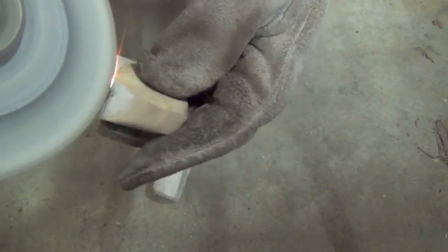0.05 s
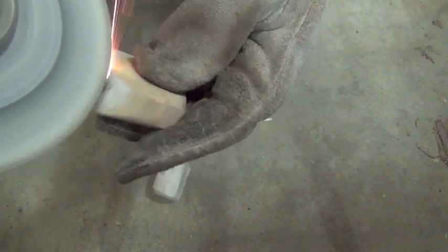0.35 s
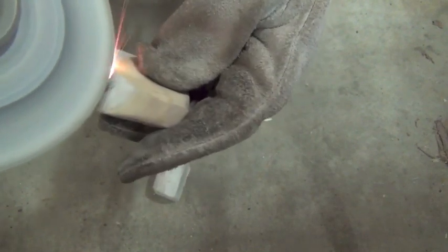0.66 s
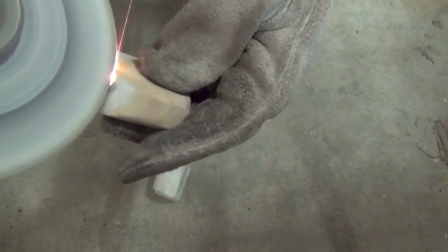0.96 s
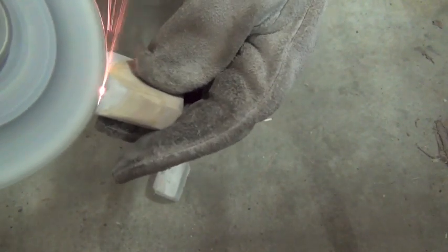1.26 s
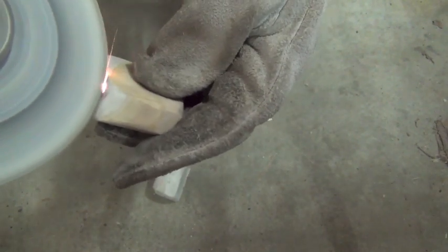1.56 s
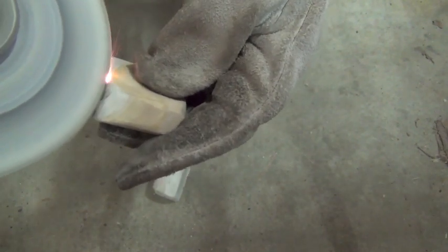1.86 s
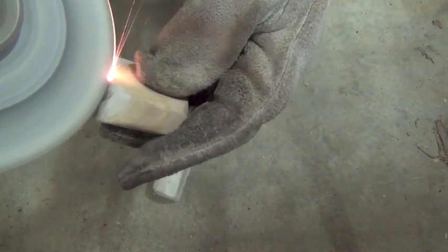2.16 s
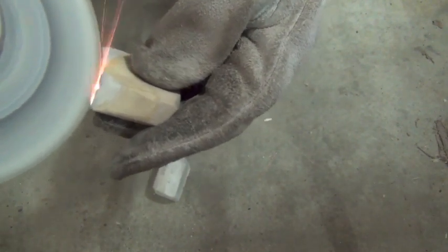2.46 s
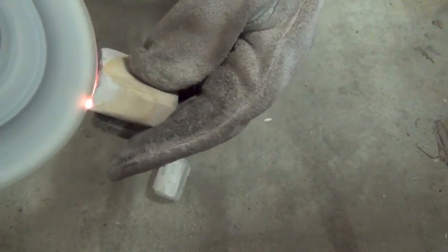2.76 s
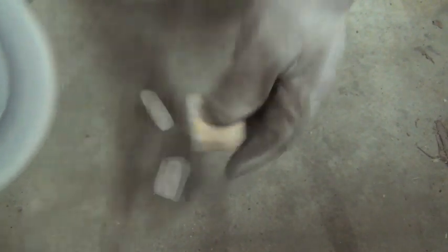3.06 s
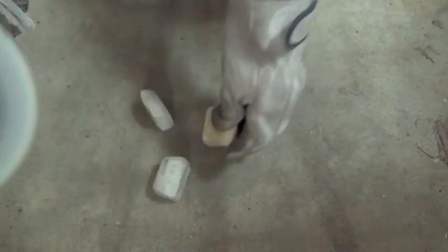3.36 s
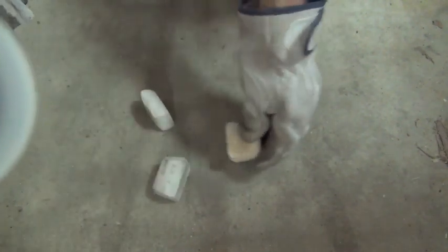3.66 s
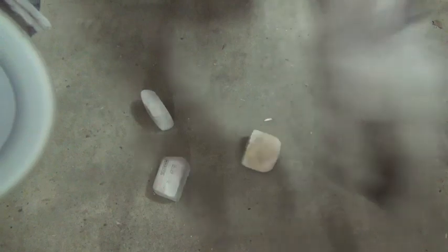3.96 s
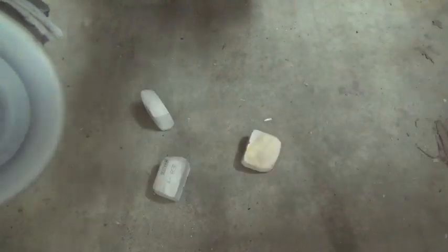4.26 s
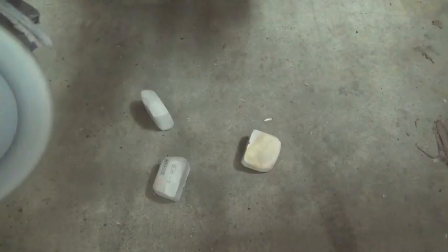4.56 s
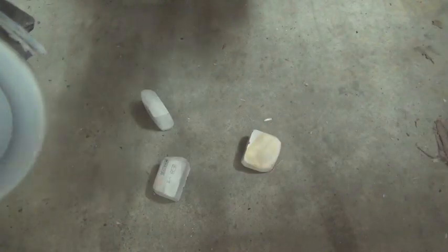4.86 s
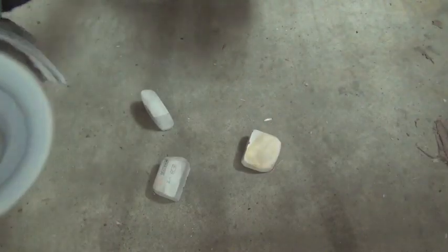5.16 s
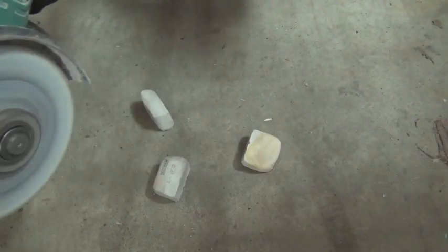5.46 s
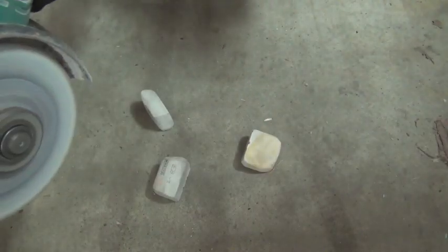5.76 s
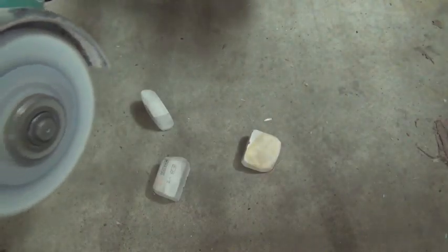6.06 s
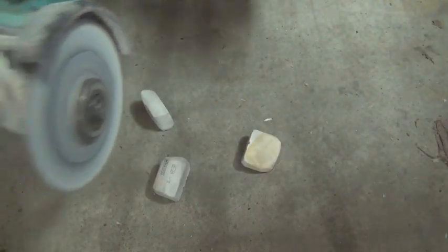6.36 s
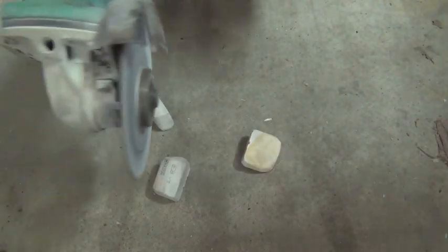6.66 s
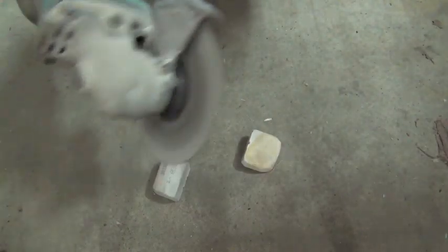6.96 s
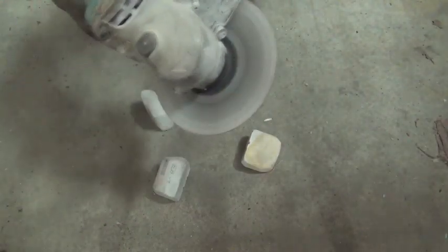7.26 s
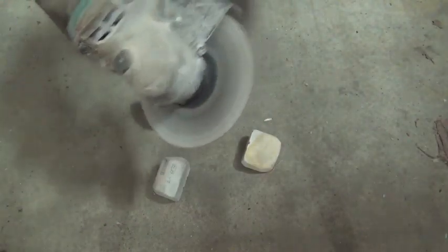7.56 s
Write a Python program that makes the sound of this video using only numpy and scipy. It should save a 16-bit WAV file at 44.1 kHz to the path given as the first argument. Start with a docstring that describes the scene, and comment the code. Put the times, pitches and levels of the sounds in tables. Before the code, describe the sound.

An angle grinder chatters against a hard stone, then runs free with a rushing whine and is switched off, falling in pitch.

```python
"""An angle grinder runs above a concrete floor: its fan rushes, its wheel hums and its motor whines.
From the start a gloved hand holds a hard stone to the wheel; it bounces on the high spot, and each
impact excites the modes of wheel and body. Near 2.9 s the stone is taken away and the motor speeds up.
Near 5.6 s it is switched off and coasts, falling in pitch, while the tool is turned round and its
directivity changes the timbre."""
import sys
import numpy as np
from scipy import signal
from scipy.fft import rfft, irfft, next_fast_len
from scipy.io import wavfile
from scipy.ndimage import uniform_filter1d

SR = 44100
rng = np.random.default_rng(int(sys.argv[2]) if len(sys.argv) > 2 else 0)


def to_wav(sig):
    """Store sig (one row per channel, or 1-D mono) as 16-bit WAV at the path in sys.argv[1].

    Samples outside -1..1 are clipped; the rate is SR.
    """
    pcm = np.clip(np.atleast_2d(sig), -1, 1) * 32767
    pcm = np.round(pcm).astype(np.int16)
    wavfile.write(sys.argv[1], SR, pcm.T)  # frames by channels


N = 344853
T = np.arange(N) / SR
FREE_HZ = 174.1  # rotation rate of the unloaded wheel

# drag of the stone, up to its removal: (time [s], speed lost [turns/s])
STONE_DRAG = [(0, 4.1), (0.25, 4.2), (1, 7.2), (1.5, 10.3), (2, 9.3), (2.4, 10.1), (2.87, 11.9)]
SINCE_RELEASE = np.maximum(T - STONE_DRAG[-1][0], 0)
# stereo balance, tool at the side and in front: (frequency [Hz], left minus right [dB])
BALANCE_BESIDE = [(60, 7), (110, -1), (190, -1), (350, 13.5), (630, 12.5), (1120, 6.5), (2020, 7.5),
                  (3620, 2.5), (6510, 0.5), (11700, 0)]
BALANCE_FRONT = [(60, 7), (110, 16), (190, 7), (350, -14), (630, -5), (1120, 0), (2020, -4.5), (3620, -2),
                 (6510, -3), (11700, 0)]


def gain_of(db):
    """Amplitude ratio of a level in decibels."""
    return 10 ** (np.asarray(db) / 20)


def follow(rows, t=T):
    """Linear interpolation of a table's columns at the times t."""
    times, *columns = np.transpose(rows)
    return [np.interp(t, times, column) for column in columns]


def spectrum_at(points, hz):
    """Interpolation of a spectrum on a logarithmic frequency axis."""
    f, value = np.transpose(points)
    return np.interp(np.log(hz + 1), np.log(f + 1), value)


def peaks(rows, at):
    """Superposed Lorentzian peaks from rows of (centre, full width, height)."""
    return sum(height / (1 + (2 * (at - centre) / width) ** 2) for centre, width, height in rows)


def unit_rms(x):
    """Normalisation to rms 1."""
    return x / np.sqrt(np.mean(x ** 2) + 1e-20)


def levelled(x, size=1600):
    """Division by the running rms evens the level over about size samples."""
    power = uniform_filter1d(uniform_filter1d(x ** 2, size), size)
    return x / np.sqrt(abs(power) + np.mean(x ** 2) / 20)


def drift(hz):
    """Random modulation: noise of rms 1, low-passed near hz."""
    size = N // 32
    f = np.fft.rfftfreq(size, 32 / SR)
    slow = irfft(rfft(rng.standard_normal(size)) * np.exp(-(f / hz) ** 2), size)
    return np.interp(T, np.arange(size) * 32 / SR, unit_rms(slow))


def mottle(shape, frames, bins):
    """Noise of rms 1, correlated over time and frequency by moving averages."""
    slow = uniform_filter1d(rng.standard_normal(shape), frames, axis=0)
    return unit_rms(uniform_filter1d(slow, bins, axis=1))


def panned(x, left_db):
    """Level-difference panning: two channels, left_db apart, whose mean is x."""
    right = 2 / (1 + gain_of(left_db))
    return np.array([(2 - right) * x, right * x])


def beside(x):
    """Frequency-dependent panning: with the tool at the side, the middle range leans left."""
    bins = rfft(x, next_fast_len(N, True))
    hz = np.linspace(0, SR / 2, len(bins))
    return irfft(panned(bins, spectrum_at(BALANCE_BESIDE, hz)))[:, :N]


def balance_db(hz, front):
    """Level difference of the channels as the tool moves from the side (0) to the front (1)."""
    return (1 - front) * spectrum_at(BALANCE_BESIDE, hz) + front * spectrum_at(BALANCE_FRONT, hz)


def facing(t=T):
    """Directivity: the share of each of the tool's four sides in what is heard, times x sides."""
    # (time [s], side heard [0 at the stone, 1 free, 2 tilted, 3 vents near])
    poses = [(2.8, 0.5), (3.1, 1), (4.9, 1), (5.4, 2.02), (6.3, 2), (7.05, 2.5)]
    pose = follow(poses, t)[0]
    return np.maximum(1 - abs(pose[:, None] - np.arange(4)), 0)


def speed_lost(recovery_s=0.95):
    """Load: turns a second lost to the stone's friction, relaxing exponentially after release."""
    return follow(STONE_DRAG)[0] * np.exp(-SINCE_RELEASE / recovery_s)


def wheel_speed(off_s=5.555, coast_s=7.6, friction_hz_per_s=16.2):
    """Turns a second; after switch-off, air drag and constant bearing friction brake the wheel."""
    friction = friction_hz_per_s * coast_s
    air_decay = np.exp(-np.maximum(T - off_s, 0) / coast_s)
    return (FREE_HZ - speed_lost() + friction) * air_decay - friction


def rush_spectrum(t, hz, echo_share=0.66):
    """Directivity, interference and cavity resonance shape the rush: dB, times x frequencies."""
    # spectrum of each side: (frequency [Hz], relative density [dB])
    at_stone = [(30, -27), (157, -16.5), (514, -8.5), (980, -12.5), (1150, -4.5), (1520, -12), (1950, 3.5),
                (2300, -3), (2600, -12.5), (3200, -7.5), (4100, -4.5), (4900, 2.5), (5700, -2),
                (6400, -8.5), (8000, -9.5), (8900, -12), (11000, -10)]
    free = [(18, -68), (30, -35), (314, -20.5), (382, -32), (489, -11.5), (611, -21), (658, -11.5),
            (726, -18), (1000, -14), (1310, -2), (1560, -5.5), (2050, -0.5), (4410, -3.5), (5930, -2),
            (11000, -6.5), (14300, -42), (22000, -120)]
    tilted = [(18, -65), (30, -32), (157, -26.5), (227, -33.5), (298, -21), (392, -27.5), (596, -18),
              (691, -21.5), (1720, -6.5), (2380, -11), (2760, -5), (4520, -2), (5370, -1), (9030, -10.5),
              (11000, -8), (14300, -40), (22000, -120)]
    vents = [(18, -64), (30, -30), (106, -22), (173, -21.5), (864, -24.5), (1160, -3.5), (1250, -6.5),
             (1720, 0), (2050, -9), (2500, -14), (3800, -9), (4520, -9), (5650, 0), (10200, -14.5),
             (11000, -25), (14300, -46), (22000, -120)]
    # echoes off floor and tool, by side: (frequency [Hz], width [Hz], lift before echo_share [dB])
    stone_echoes = [(1170, 52, -7), (2300, 130, 5), (2450, 66, -11), (2600, 240, -5.5), (3660, 360, -11.5),
                    (4600, 66, -12), (5370, 160, 1), (6160, 350, -6), (8600, 200, 6), (9400, 110, -4)]
    free_echoes = [(1590, 60, -2), (1800, 120, 5.5), (1890, 60, -9), (2100, 400, -2), (2570, 150, -1),
                   (3680, 87, 10.5), (3920, 110, 0), (4100, 250, -3), (5900, 180, 6.5), (9000, 480, -7)]
    tilted_echoes = [(1300, 60, 1), (1600, 110, -6), (1740, 81, -0.5), (2080, 95, 3.4), (2370, 110, 0.5),
                     (2750, 92, 2), (4570, 270, -13), (5330, 390, -3), (8270, 110, 1), (9000, 380, -6)]
    vent_echoes = [(1540, 250, 6.5), (2020, 120, -11), (2420, 65, -16), (2630, 90, -5), (3680, 170, 9),
                   (4530, 350, -1), (5550, 200, 4), (5900, 110, -6), (7900, 110, 7), (10700, 110, -8)]
    # resonances of wheel and tool, the first the wheel's own ring set sounding by the air: (frequency [Hz],
    # width [Hz], lift on each of the four sides [dB])
    resonances = [(1730, 90, 2, 3, 2, 2), (2150, 270, 1, -2.5, 3, -2), (5680, 600, 4.5, 1.2, 1.7, 2)]
    # the guard's cavity sinks in pitch as the tool turns: (time [s], frequency [Hz], lift [dB])
    guard = [(0, 3230, 8.5), (1.1, 3110, 3.5), (2.9, 3010, 4.5), (3.6, 3230, 3.5), (4.4, 3380, 9.5),
             (5.5, 3360, 2), (6.35, 2580, 6.5), (6.9, 2460, 15.5), (7.82, 2300, -4)]
    # hand and tool move: (time [s], duration [s], frequency [Hz], width [Hz], lift [dB])
    band_swells = [(3.74, 1.7, 2180, 480, 7.5), (6.4, 0.25, 5100, 430, 2), (6.87, 0.4, 6030, 220, 5),
                   (7.32, 0.6, 6600, 540, 3.5), (7.3, 0.49, 5530, 200, 2.5), (7.2, .35, 8200, 700, 0.5),
                   (7.7, 0.5, 1755, 63, 12)]
    # shelf above about 7 kHz: (time [s], lift [dB])
    treble = [(0, -2), (5.8, 0), (6.2, -1.5), (6.77, 1), (6.95, 0.5), (7.1, 1.5), (7.82, 0)]
    # rush of fan and gears in its middle band: (time [s], relative level [dB])
    loudness = [(0, -18), (.9, -18.5), (1.5, -20.5), (1.95, -19), (2.3, -20.6), (2.8, -21.5), (2.92, -19.5),
                (4.1, -18), (6, -16.5), (7.3, -16), (7.65, -16.5), (7.82, -17.5)]
    share = facing(t)
    sides = [(at_stone, stone_echoes), (free, free_echoes), (tilted, tilted_echoes), (vents, vent_echoes)]
    colour = share @ np.array([spectrum_at(side, np.minimum(hz, 10500)) + echo_share * peaks(echoes, hz)
                               for side, echoes in sides])
    for centre, width, *lifts in resonances:
        colour += peaks([(centre, width, (share @ lifts)[:, None])], hz)
    guard_hz, guard_db = follow(guard, t[:, None])
    colour += peaks([(guard_hz, 175, guard_db)], hz)
    for time, length, centre, width, lift in band_swells:
        swell_db = peaks([(time, length, lift)], t[:, None])
        colour += peaks([(centre, width, swell_db)], hz)
    middle_band = (hz > 2600) & (hz < 7000)
    middle_db = 10 * np.log10((gain_of(colour)[:, middle_band] ** 2).sum(1))
    colour += np.outer(follow(treble, t)[0], spectrum_at([(6000, 0), (7800, 1)], hz))
    return colour + (follow(loudness, t)[0] - middle_db)[:, None]


def fan_rush(turns, patchy_db=1.0, ripple_db=1.47, flicker_db=0.79, scrape_depth=0.4):
    """Turbulence: air torn by the fan radiates broadband noise, partly coherent between the channels."""
    # likeness of left and right: (frequency [Hz], correlation [0 to 1])
    correlation = [(40, 0.97), (120, 0.18), (300, 0.66), (700, 0.63), (1500, 0.98), (5000, 1), (8000, 0.9),
                   (11000, 0.81)]
    t = np.arange(N // 256 + 5) * 256 / SR
    hz = np.fft.rfftfreq(1024, 1 / SR)
    noise = rng.standard_normal((4, len(t), len(hz)))
    left, independent = noise[::2] + 1j * noise[1::2]
    likeness = spectrum_at(correlation, hz)
    right = likeness * left + np.sqrt(1 - likeness ** 2) * independent
    colour = rush_spectrum(t, hz) + patchy_db * mottle(left.shape, frames=10, bins=8)
    # echoes leave fine ripples that shift as the tool moves
    colour += ripple_db * mottle(left.shape, frames=90, bins=3)
    spectra = np.array([left, right]) * panned(gain_of(colour), balance_db(hz, facing(t)[:, -1:]))
    air = signal.istft(spectra.swapaxes(1, 2), nperseg=1024, noverlap=768)[1][:, :N]
    # grit scrapes the stone harder once a turn
    scrape = scrape_depth * facing()[:, 0] * np.cos(2 * np.pi * turns)
    hiss = signal.sosfiltfilt(signal.butter(2, 4200, "high", fs=SR, output="sos"), air)
    return (air + hiss * scrape) * gain_of(flicker_db * drift(79))


def wheel_hum(speed, turns, fade_s=0.58, db_per_octave=7.5, waver_db=1, flutter_db=3):
    """Rotating unbalance forces three harmonics of the wheel's speed, louder against the stone."""
    # a row per harmonic: (base level running free [dB], base level against the stone [dB])
    harmonics = [(-59.5, -44), (-65, -60.5), (-60, -54)]
    # resonances that lift a harmonic gliding through: (frequency [Hz], width [Hz], lift [dB])
    housing_modes = [(123, 26, 5.5), (300.6, 32.6, 23.5), (464, 53, 19), (386.9, 45, 17)]
    # the stone is pressed hardest: (time [s], duration [s], lift of 2nd [dB], lift of 3rd [dB])
    growls = [(2.6, 0.24, 12, -7), (2.87, 0.1, 15, 15.5)]
    loaded = np.exp(-SINCE_RELEASE / fade_s)
    slowing_db = db_per_octave * np.log2(speed / FREE_HZ)
    lines = []
    for k, (free_db, loaded_db) in enumerate(harmonics, 1):
        db = free_db + (loaded_db - free_db) * loaded + k * slowing_db + peaks(housing_modes, k * speed)
        if k == 1:
            db += waver_db * drift(16)
        else:
            db += flutter_db * drift(9.6)
            db += peaks([(time, length, lifts[k - 2]) for time, length, *lifts in growls], T)
        lines.append(np.sqrt(2) * gain_of(db) * np.sin(2 * np.pi * (k * turns + rng.random())))
    return panned(lines[0], left_db=-5) + beside(sum(lines[1:]))


def motor_whine(speed, turns, gear_ratio=3.92, load_db_per_hz=0.36, rough_db=2.5, flutter_rad=0.4):
    """Harmonics of the armature, geared faster than the wheel; the air stream modulates the upper ones."""
    # a row per harmonic: (base level at the stone [dB], free [dB], tilted [dB], vents near [dB])
    harmonics = [(-57, -46.5, -39.5, -47.5), (-47.5, -34.5, -40.5, -60), (-41.5, -44, -40, -50),
                 (-48, -55, -47, -49), (-47, -35.5, -39, -40), (-50, -47, -39.5, -39), (-59, -52, -41, -44),
                 (-46, -35, -35, -40.5), (-45, -42, -41, -29)]
    # resonance that lifts the fundamental: (frequency [Hz], width [Hz], lift [dB])
    motor_mode = [(543, 104, 7)]
    # the lowest harmonics swell: (time [s], duration [s], lift of 1st [dB], lift of 2nd [dB])
    swells = [(2.88, 0.22, 4.5, 1), (3.77, 0.12, 1, 7), (4.55, 0.15, 2.5, 4.5), (6.4, .2, -1, 6)]
    first_swell, second_swell = (
        peaks([(time, length, lifts[k]) for time, length, *lifts in swells], T) for k in range(2))
    angle = 2 * np.pi * (gear_ratio * turns + 0.016 * drift(24))
    share = facing()
    whine = np.zeros((2, N))
    for k, by_side in enumerate(harmonics, 1):
        if k == 1:
            lift_db = load_db_per_hz * speed_lost() + peaks(motor_mode, gear_ratio * speed)
            lift_db += first_swell + drift(22)
            phase = angle
        else:
            lift_db = rough_db * drift(29) + (k == 2) * second_swell - 1
            phase = k * angle + flutter_rad * drift(35)
        line = np.sqrt(2) * gain_of(share @ by_side + lift_db) * np.sin(phase)
        whine += panned(line, balance_db(k * gear_ratio * FREE_HZ, share[:, -1]))
    return whine


def bite(start, length, grab_s=0.023, release_s=0.035, arch_db=1.5):
    """Contact envelope: the stone grabs, presses hardest halfway, and lets go."""
    edges = np.clip(0.5 + np.minimum((T - start) / grab_s, (start + length - T) / release_s), 0, 1)
    arch = np.sin(np.pi * np.clip((T - start) / length, 0, 1)) - 2 / np.pi
    return edges * gain_of(arch_db * arch)


def ring(force, modes):
    """Modal superposition: neighbours start in antiphase, so a close pair swells before it dies."""
    t = np.arange(4096) / SR
    response = np.zeros_like(t)
    for k, (hz, width, db) in enumerate(modes):
        envelope = gain_of(db) * width * np.exp(-np.pi * width * t)
        response += (-1) ** k * envelope * np.cos(2 * np.pi * hz * t)
    return signal.oaconvolve(force, response)[:N]


def stone_chatter(turns, jitter_s=0.00016, uneven_db=0.6, grit=0.05, grit_s=0.0013, tumble=0.81):
    """Impact excitation: the wheel's high spot kicks the stone, which lands one to three turns later."""
    # (start [s], duration [s], wheel ring [dB], body thud before trim [dB], hop [turns])
    bites = [(.035, 0.054, -20.5, -39, 1), (0.146, 0.074, -26, -38, 3), (0.236, 0.058, -24.5, -36, 3),
             (0.292, 0.13, -22.5, -39.5, 2), (0.502, 0.12, -22.5, -34, 2), (0.669, 0.1, -24.5, -42, 2),
             (0.764, 0.12, -26.5, -37, 2), (.905, 0.1, -23.5, -35.5, 2), (1.005, 0.2, -25, -38, 2),
             (1.204, .21, -22.5, -35, 1.3), (1.413, 0.16, -21, -36.5, 1.3), (1.575, 0.083, -23, -32, 1.3),
             (1.658, 0.092, -21, -32.5, 1.3), (1.757, 0.293, -22.5, -34.5, 2), (2.06, 0.16, -22, -34, 2),
             (2.223, 0.13, -20.5, -32.5, 2), (2.345, 0.16, -24, -34.5, 1.1), (2.504, 0.1, -20, -31, 1),
             (2.609, 0.19, -20, -35.5, 1), (2.807, 0.069, -21.5, -33, 1)]
    # modes rung by a blow: (frequency [Hz], bandwidth [Hz], relative level [dB])
    wheel_modes = [(1320, 29, -64), (1773, 112, 14.5), (1870, 330, -3), (3000, 150, -16), (5400, 240, -20),
                   (5680, 270, -16), (9400, 170, -33)]
    body_modes = [(297.3, 9.5, 4.5), (502.6, 23, -3), (751, 17.5, -1.5), (817, 89, -13.5)]
    start, length, ring_db, thud_db, hops = np.transpose(bites)
    passes = np.interp(np.arange(1, turns[-1]), turns, T)  # when the high spot comes round
    passes = passes[(passes > start[0]) & (passes < start[-1] + length[-1])]
    hop = hops[np.searchsorted(start, passes) - 1]
    blows, k = np.zeros(N), 0
    while k < len(passes):
        late, size, flight = rng.standard_normal(3)
        blows[round((passes[k] + jitter_s * late) * SR)] = gain_of(uneven_db * size)
        k += max(1, round(hop[k] + 0.22 * flight))
    # each blow drags a short burst of grit across the stone
    bursts = signal.lfilter([1], [1, -np.exp(-1 / (grit_s * SR))], blows + 1e-12)
    force = blows + grit * bursts * rng.standard_normal(N)
    contact = np.array([bite(time, held) for time, held in zip(start, length)])
    wheel = gain_of(ring_db) @ contact * levelled(ring(force, wheel_modes))
    # the stone tilts in the glove, so each blow shakes the body by a different amount
    shake = force * (1 + tumble * drift(120))
    body = gain_of(thud_db - 1) @ contact * levelled(ring(shake, body_modes))
    return beside(wheel + body)


def scene():
    """Superposition of four sources that share the angle of the wheel."""
    speed = wheel_speed()
    turns = np.cumsum(speed) / SR
    return fan_rush(turns) + wheel_hum(speed, turns) + motor_whine(speed, turns) + stone_chatter(turns)


def record(dry):
    """Band limiting: a linear-phase low-pass near 11 kHz."""
    low_pass = signal.firwin(1023, 11080, window=("kaiser", 9), fs=SR)
    return signal.oaconvolve(dry, low_pass[None], "same")


dry = scene()
out = record(dry)
to_wav(out)
```